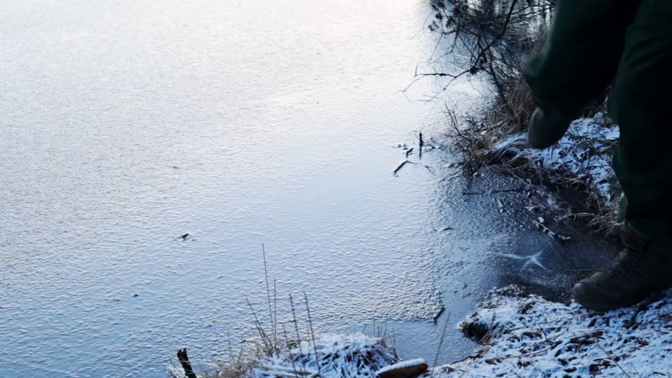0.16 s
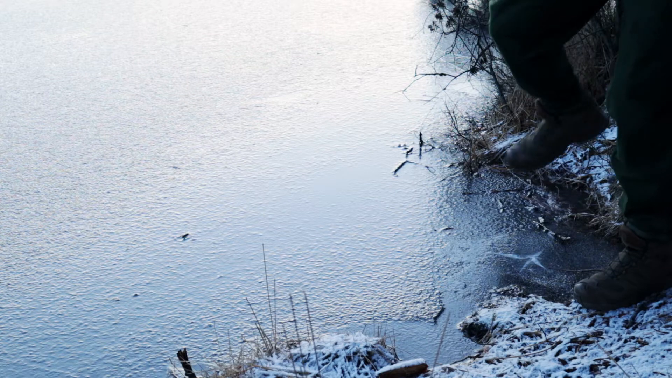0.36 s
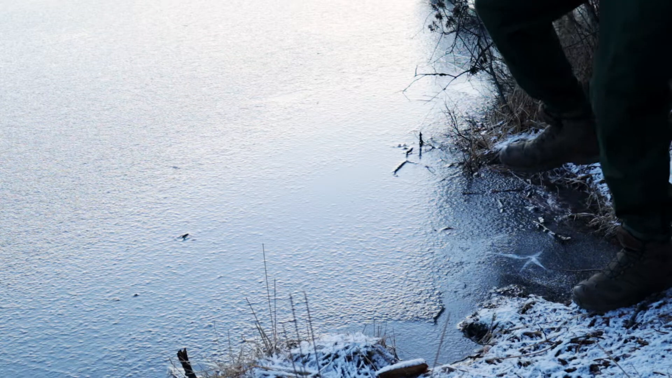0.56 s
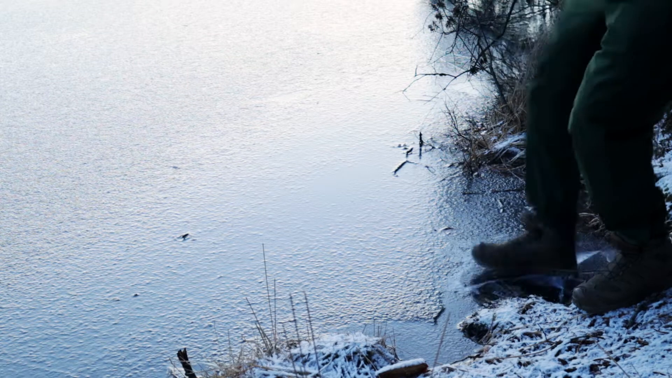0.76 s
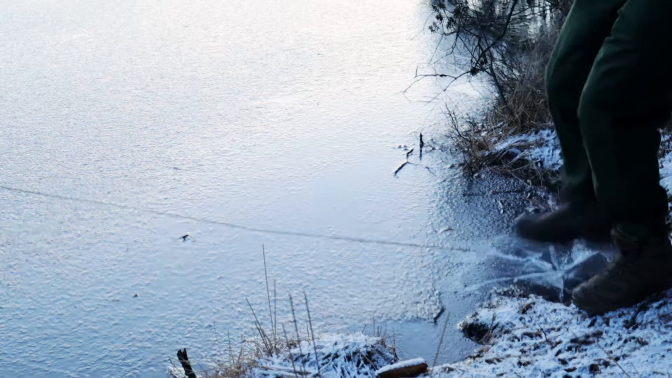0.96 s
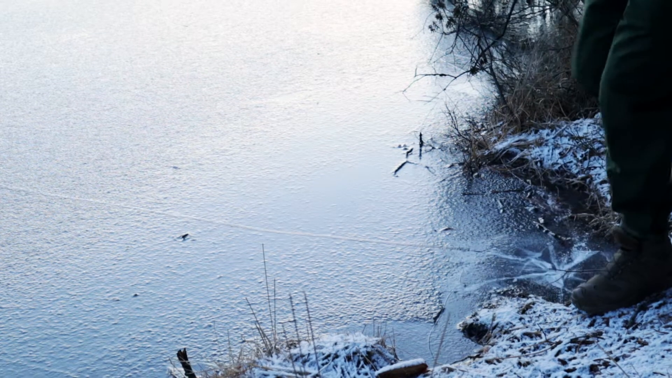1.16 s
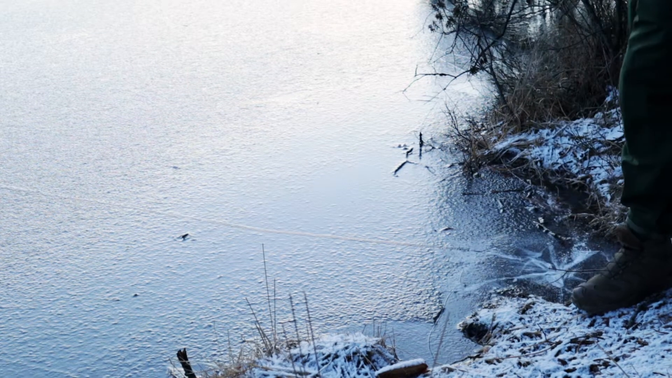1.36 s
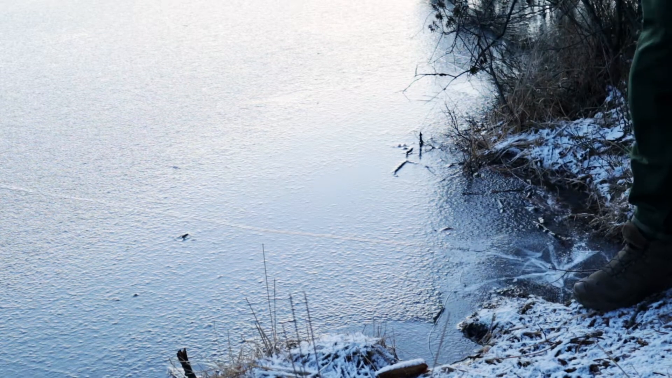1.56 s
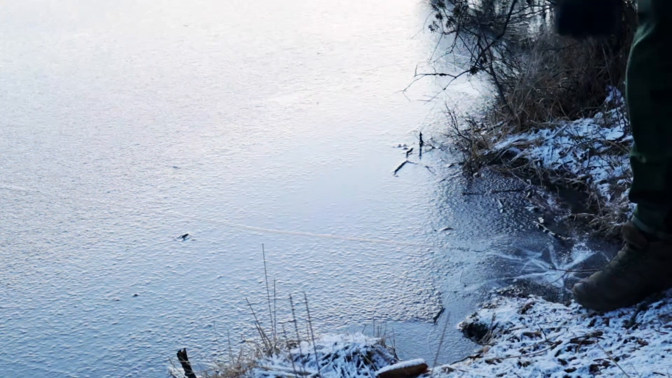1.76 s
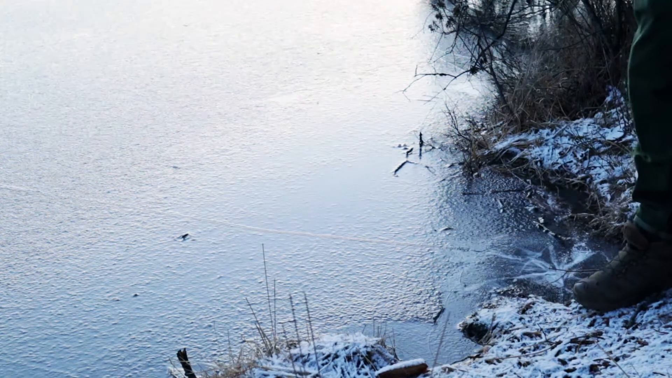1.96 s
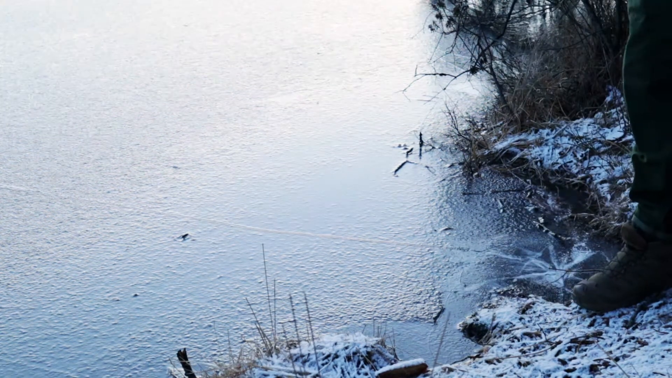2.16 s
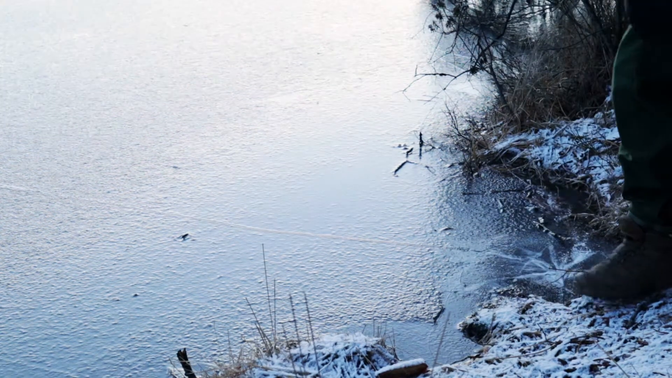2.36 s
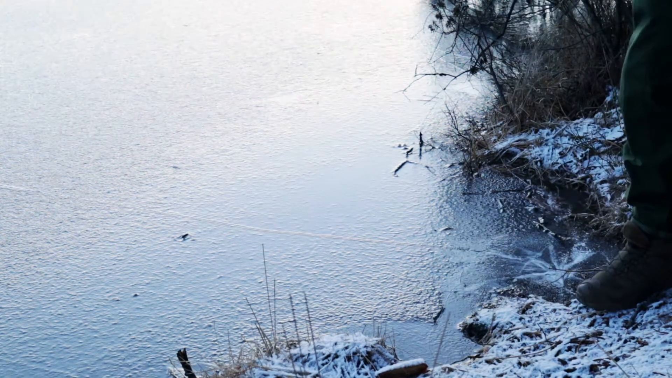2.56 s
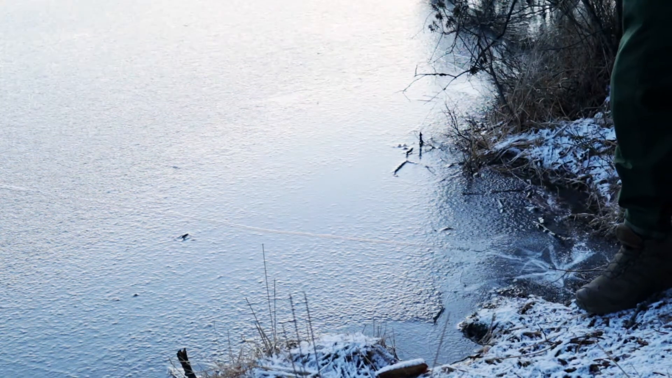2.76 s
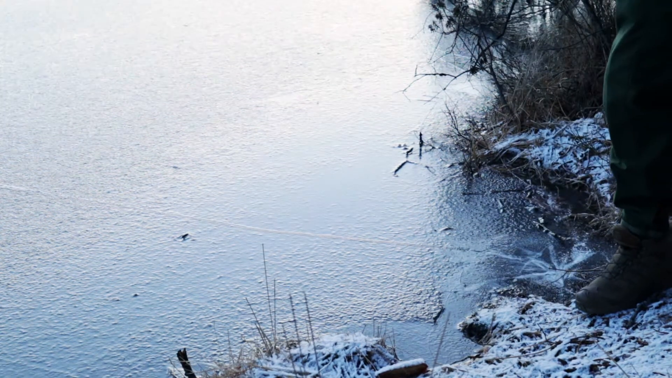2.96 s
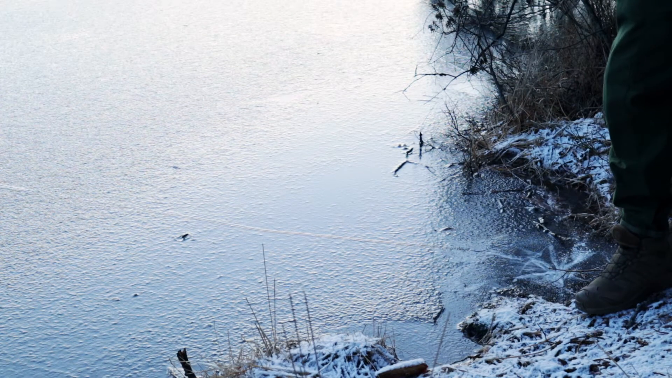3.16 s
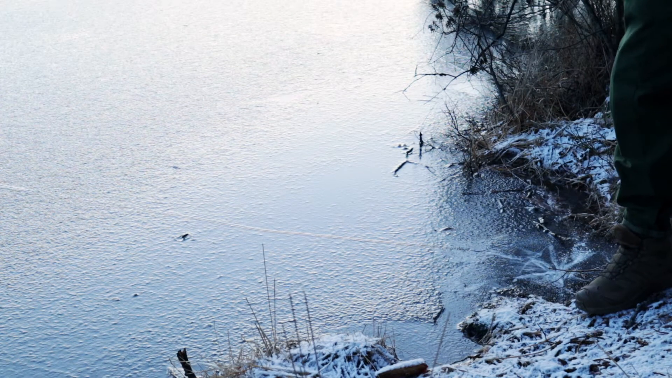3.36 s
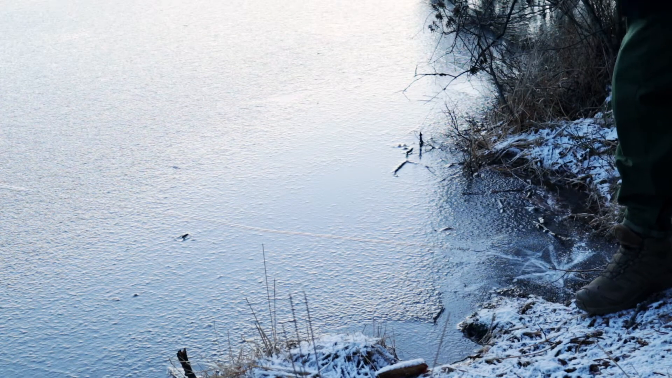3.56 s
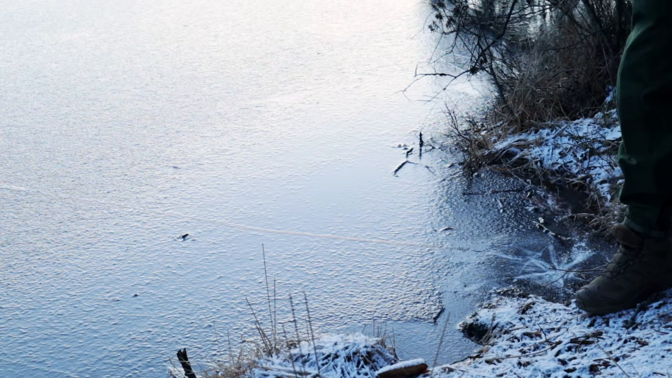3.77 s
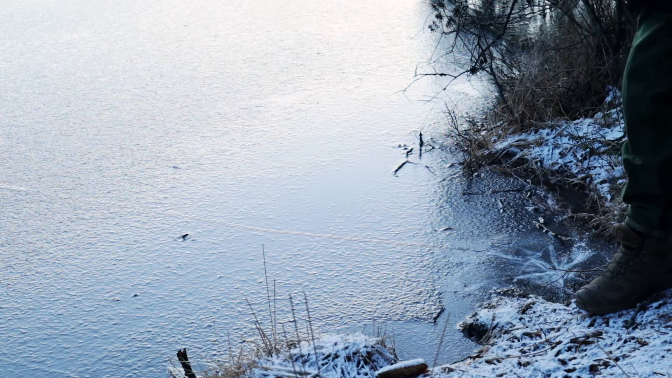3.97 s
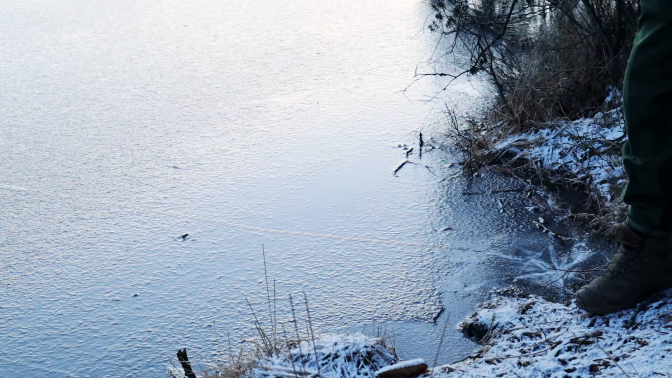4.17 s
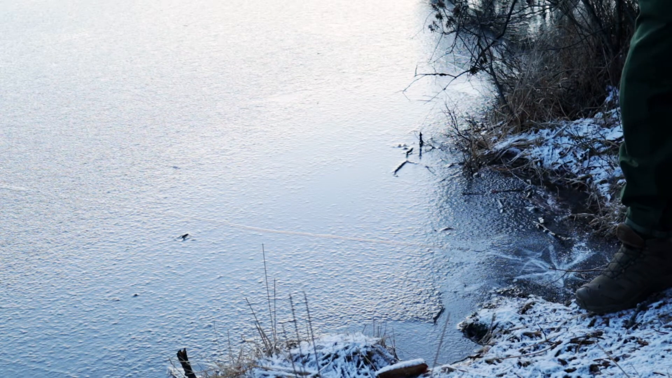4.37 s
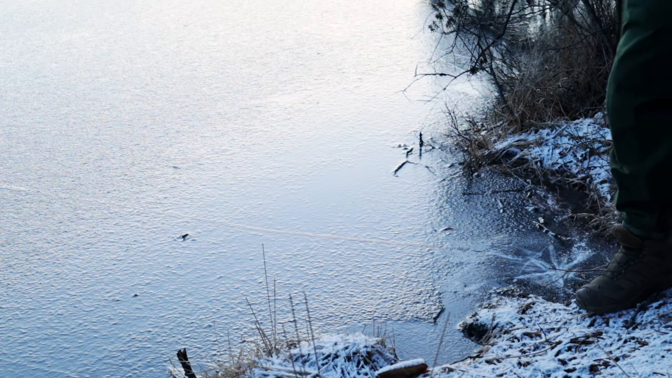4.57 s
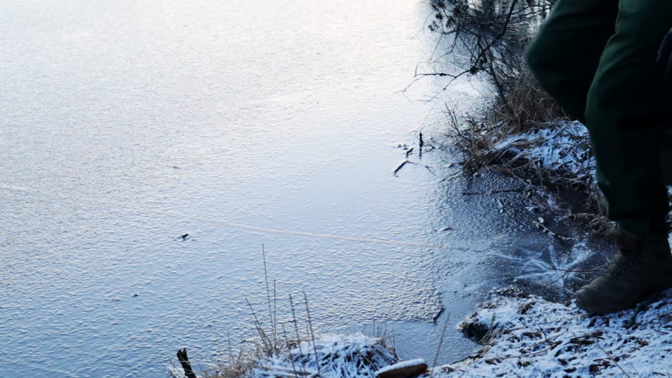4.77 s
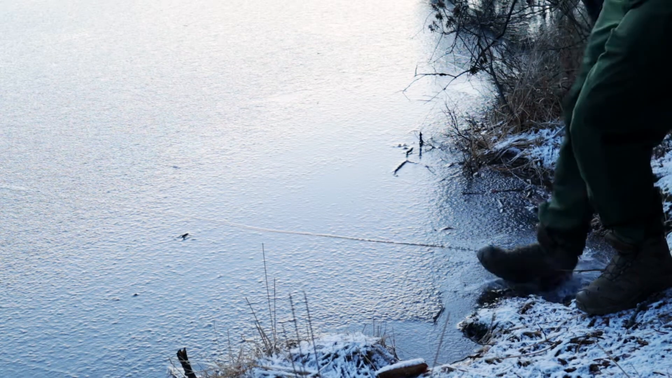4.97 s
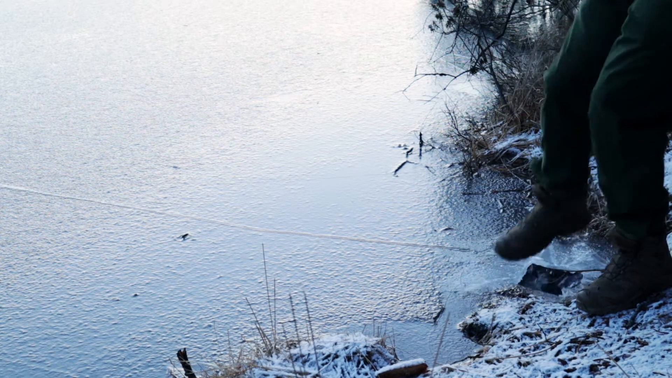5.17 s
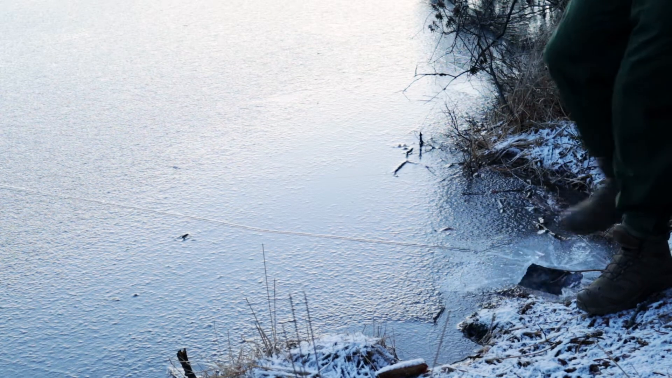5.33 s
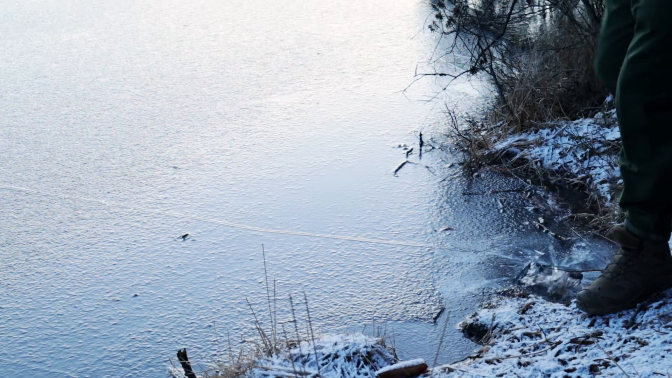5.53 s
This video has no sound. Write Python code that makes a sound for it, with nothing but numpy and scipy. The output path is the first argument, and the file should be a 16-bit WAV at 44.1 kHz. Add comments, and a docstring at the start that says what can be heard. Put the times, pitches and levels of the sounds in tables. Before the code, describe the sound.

Thin ice cracks loudly under a stamp, ticks quietly as the walker shifts, then a second stamp smashes through it with clinking shards and water plops.

```python
"""On a frozen shore, a little to the right, a boot stamps twice on thin ice; a faint outdoor hush lies behind.
The first stamp cracks the sheet and the sole grinds over it: sharp releases, bending-wave chirps, noise grains.
The ice ticks in short wavelets while the walker shifts weight; trousers rustle and the boot scuffs in shaped noise.
The second stamp breaks through: shards clink as damped modes and water gulps as tones of rising pitch."""
import sys
import numpy as np
from scipy import signal
from scipy.fft import rfft, irfft, next_fast_len
from scipy.io import wavfile
from scipy.ndimage import uniform_filter1d, map_coordinates

SR = 44100
rng = np.random.default_rng(int(sys.argv[2]) if len(sys.argv) > 2 else 0)


def bounce(signal):
    """Save signal as a 16-bit WAV file at the path given by the first command-line argument."""
    frames = np.transpose(np.atleast_2d(signal))
    limited = np.clip(frames, -1, 1)
    pcm = np.round(limited * 32767).astype(np.int16)
    wavfile.write(sys.argv[1], SR, pcm)


N = 246959

STAMP_S, BREAK_S = .85, 5.01  # the first stamp; the boot goes through
TOP_HZ = 16300  # band limit of the microphone
# An attack is the time in which a movement rises by 60 dB; a t60 is the time in which it falls by 60 dB.
CRUSH_ATTACK_S, CRUSH_HOLD_S = 0.02, 0.0041
SLIDE_ATTACK_S, SLIDE_T60_S = 0.021, 0.12
SWISH_ATTACK_S, SCUFF_ATTACK_S = 0.56, .06
DEBRIS_DB, DEBRIS_T60_S, DEBRIS_DELAY_S = -57, 6, 0.08  # splinters settle after the sheet has given way

# All source levels are mix levels, ahead of the left-right shading and the microphone.
# outdoor hush: t/s, level/dB
HUSH_LEVEL = [(0, -54.5), (1.5, -50.5), (2.6, -50.5), (3.6, -53), (4.5, -52), (5.6, -50.5)]
# a leg moves and the trousers swish: t/s, hold/s, level/dB, t60/s
SWISHES = [(0, 0.088, -52, 0.44), (0.284, 0.021, -52.5, 1.13), (0.566, 0.17, -58.5, 0.46),
           (0.694, 0.14, -54, .6), (1.097, 0.05, -52, 1.7), (1.526, 0.075, -52.5, 0.83),
           (1.72, 0.067, -56, 1.1), (2.205, 0.077, -46.5, .09), (2.335, 0.014, -48.5, 1.02),
           (2.562, 0.61, -60.5, 7.7), (4.675, 0.032, -56.5, 0.23), (4.817, 0.23, -59.5, .5)]
# the boot twists on the frozen bank: t/s, hold/s, level/dB, t60/s
SCUFFS = [(2.19, 0.023, -45, .2), (2.222, 0.04, -47, .1), (2.26, 0.0087, -36, 0.037),
          (2.279, .006, -43, 0.041), (2.311, .004, -45.5, .08), (2.331, 0.022, -46.5, 0.28)]
# water slops over the rim of the hole: t/s, hold/s, level/dB, t60/s
SPLASHES = [(5.489, 0.011, -47.5, 0.067), (5.512, 0.011, -33.5, 0.055), (5.54, .003, -49, .06),
            (5.56, .008, -42.5, 0.13)]
# air pockets ring in the water: t/s, level before the attack/dB, starting f/Hz, t60/s
BUBBLES = [(.173, -42.5, 410, 0.031), (.177, -41.5, 244, 0.064), (3.96, -44.5, 358, 0.08),
           (5.064, -25.5, 1012, 0.057), (5.1455, -16.5, 660, 0.028), (5.167, -23, 620, 0.023),
           (5.174, -22, 640, 0.042), (5.195, -42, 551, 0.2), (5.329, -41, 350, 0.036),
           (5.377, -46, 655, .04), (5.482, -28.5, 246, 0.1), (5.5055, -5, 820, 0.011),
           (5.507, -23, 241, 0.064), (5.511, -26, 1152, 0.034), (5.514, -30.5, 1530, 0.032),
           (5.535, -42, 690, .06), (5.517, -30, 720, 0.039), (5.521, -23.5, 1814, 0.038),
           (5.522, -22, 2410, 0.03), (5.551, -30.5, 756, 0.055), (5.552, -25, 268, 0.074),
           (5.562, -30.5, 233, 0.11), (5.565, -27.5, 3520, 0.015), (5.58, -34, 1940, 0.026)]
# loose pieces of ice clink: t/s, level/dB, base f/Hz, base t60/s
SHARDS = [(.9405, -27, 1980, 0.032), (.9555, -24, 890, 0.017), (0.955, -33, 1660, 0.037),
          (1.056, -28, 853, 0.11), (1.068, -32, 1796, 0.062), (1.079, -28.5, 770, 0.078),
          (1.1, -25, 2710, 0.034), (1.103, -26.5, 2230, 0.047), (1.11, -20.5, 2820, 0.018),
          (2.258, -27, 1696, 0.022), (2.4155, -18.5, 1440, 0.014), (5.0768, -9, 9800, 0.0075),
          (5.1058, -32, 6400, 0.014), (5.322, -42, 3970, 0.028), (5.327, -47, 2530, 0.061),
          (5.265, -49, 1180, .04), (5.298, -42, 3800, .03), (5.438, -48, 1450, .03),
          (5.371, -48, 3800, 0.042), (5.387, -45, 3110, 0.033), (5.391, -45, 2230, 0.037),
          (5.434, -38, 5900, 0.014), (5.457, -50, 1560, 0.045), (5.462, -36, 5570, 0.018)]
# modes of an uneven flake: ratio to the base f, level/dB, share of the base t60
SHARD_MODES = [(.81, -14, 0.59), (1, 1.5, 0.96), (1.17, -6.5, 0.73), (1.42, -18, 0.61)]
# the sole slides over frost: t/s, hold/s, level/dB
SLIDES = [(0.857, 0.004, -31), (0.885, 0.071, -41.5), (0.96, 0.068, -33), (1.026, 0.0092, -30),
          (1.095, 0.0051, -29.5), (5.017, 0.04, -33), (5.136, 0.045, -37.5), (5.203, 0.11, -46),
          (5.522, .005, -41), (5.551, 0.0069, -41.5)]
# the boot crushes ice, or loose pieces wash together: t/s, grit level/dB, sheet heave level/dB, t60/s
CRUSHES = [(0, -40, -40, 0.13), (.06, -64, -47, 0.48), (0.863, -34, -27.5, 0.47), (.887, -46, -46, 0.1),
           (.932, -42, -29.5, 0.33), (0.995, -44, -31, .2), (1.039, -41, -28, 0.31),
           (1.067, -33.5, -43, 0.21), (1.101, -32, -34, 0.19), (1.128, -53, -42, 0.12),
           (5.0225, -21.5, -31, 0.15), (5.062, -40.5, -41, 0.57), (5.145, -42, -38, 0.21),
           (5.173, -33.5, -52, 0.2), (5.205, -63, -64, 0.43), (5.325, -55, -60, 0.13),
           (5.37, -54.5, -60, 1), (5.498, -43, -68, .1), (5.524, -40, -71, 0.15), (5.558, -47, -74, 0.12)]
# the sheet flexes under the boot: t/s, level before the attack/dB, starting f/Hz, t60/s
KNOCKS = [(.005, -32, 110, 0.031), (.8535, -5, 204, 0.028), (.8635, -21.5, 105, 0.06),
          (.9295, -22.5, 147, 0.063), (.9405, -16.5, 95, 0.026), (.973, -22, 109, 0.037),
          (.9935, -18.5, 119, 0.028), (1.04, -25, 132, 0.014), (1.0935, -20, 222, 0.023),
          (1.125, -35, 89, .08), (1.15, -31, 48.3, 0.32), (1.474, -33, 110, 0.031),
          (2.263, -19, 160, 0.026), (2.3685, -33.5, 240, 0.027), (2.4, -43, 240, 0.016),
          (2.4165, -17, 394, 0.01), (2.4235, -32, 230, 0.025), (5.0135, -5.5, 188, 0.021),
          (5.024, -9, 75, 0.032), (5.0215, -11.5, 243, 0.068), (5.0615, -14, 198, 0.017),
          (5.1475, -21, 227, 0.026), (5.1665, -11.5, 300, 0.0075), (5.178, -17, 350, 0.023),
          (5.039, -26, 80, .09), (5.278, -43, 348, .025)]
# single light ticks of the strained ice: t/s, peak level/dB, f/Hz, treble edge level/dB
TICKS = [(0.0226, -24.5, 1680, -10), (0.0469, -31, 2900, -16), (0.0823, -34, 1890, -11),
         (0.089, -32, 1180, -23), (0.1384, -24, 1250, -24), (0.1473, -25.5, 1270, -18),
         (0.1621, -35.5, 1190, -19), (0.3132, -34, 1050, -17), (0.4118, -33.5, 2070, -8),
         (0.6336, -33.5, 1050, -22), (1.6097, -31, 2500, -1), (2.5825, -31.5, 1150, -36),
         (2.9414, -30, 1310, -23), (3.111, -36.5, 1610, -17), (3.2155, -36.5, 1000, -32),
         (3.35, -37.5, 1220, -19), (3.94, -43, 1300, -19), (4.668, -30.5, 930, -39),
         (4.6959, -23.5, 2140, -36), (4.729, -36.5, 940, -30), (5.229, -34, 2200, -8),
         (5.274, -41, 1900, -10), (5.457, -30, 2400, -1)]
# clean fractures, heard as a falling chirp:
# t/s, peak level/dB, tilt/dB per octave, top f/Hz, travel time of the bending wave at 1 kHz/s
SNAPS = [(0.8524, -8, -1, 3540, 0.00087), (0.887, -9.5, 1, 7000, 0.00053), (0.9414, -10, 6, 7500, 0.00039),
         (0.9553, -22, 1.5, 3600, 0.00056), (0.903, -25, 1.5, 4000, 0.00068),
         (0.9847, -16.5, 3.5, 4500, 0.00079), (1.0938, -11, 8, 5000, 0.00025),
         (1.1098, -20.5, -2.5, 4000, 0.00027), (1.1326, -21.5, 3, 3200, 0.00077),
         (1.1416, -19, 1.5, 4800, 0.00059), (2.4152, -15.5, 3, 5100, 0.0014),
         (2.4228, -25, -0.5, 2200, 0.0011), (5.0126, -9, -3, 2600, 0.00079), (5.0605, -26, 4, 6000, .0004),
         (5.0186, -5.5, 2, 11000, 0.00027), (5.0221, -4.5, 2.5, 3500, .0005),
         (5.0238, -11, 9, 3000, 0.00051), (5.0264, -10, 6, 6000, 0.00032),
         (5.0309, -14.5, -0.5, 3000, 0.00067), (5.0617, -15.5, -1.5, 3500, 0.00062),
         (5.0459, -14, 3, 4000, 0.00048), (5.163, -21, 8, 8000, 0.00043), (5.1734, -5.5, 9, 5000, 0.00028),
         (5.1746, -15.5, 0, 4200, 0.00045)]
# fractures that run through the sheet: t/s, level/dB, f/Hz, treble edge level/dB, splintering t60/s
CRACKS = [(0.8535, -18, 980, -34, 0.008), (0.8567, -16.5, 2180, -8.5, 0.02), (.864, -24.5, 2000, 2, .02),
          (0.8695, -29, 2000, -20, 0.02), (0.878, -26.5, 1400, -25.5, 0.014),
          (0.8927, -30.5, 1500, -24, 0.0061), (0.903, -39, 1400, -20, 0.0064),
          (0.9298, -31, 800, -18, 0.008), (0.9407, -29, 3120, -20, 0.012), (1.038, -31, 1200, -13, 0.092),
          (1.088, -26.5, 2300, -8, 0.011), (1.0926, -22.5, 2300, -5, 0.028),
          (1.0993, -19.5, 2570, 7.5, 0.0051), (1.1035, -27, 2600, 2, .006), (1.11, -27, 2800, 0, 0.0053),
          (1.4708, -46, 2530, -1, 0.06), (1.545, -51, 1000, -20, .09), (1.562, -44, 1400, -17, 0.047),
          (1.6605, -49.5, 1490, -24, 0.099), (1.73, -50.5, 1000, -15, 0.11),
          (2.2586, -36.5, 1920, -6, 0.014), (2.2682, -39, 1600, -25, 0.012),
          (5.014, -19.5, 910, -22, 0.013), (5.0175, -14, 1800, -0.5, 0.019), (5.0222, -19, 1710, -9, 0.012),
          (5.026, -22.5, 1800, 0, 0.008), (5.0314, -26, 1040, -13, 0.02), (5.046, -20, 1700, -22, 0.016),
          (5.0538, -28.5, 1620, -27, 0.048), (5.063, -21.5, 1070, -15, 0.026),
          (5.0753, -28.5, 5000, -20, 0.01), (5.139, -35.5, 1500, -10, 0.016),
          (5.147, -36, 1800, -22, 0.016), (5.1616, -26.5, 2000, -2, 0.0089),
          (5.1657, -25.5, 1090, -1.5, 0.02), (5.1741, -28.5, 3000, -25, 0.022),
          (5.4701, -30, 6250, 35, 0.021), (5.507, -34, 885, -23, 0.069), (5.5215, -38, 2190, -26, 0.082),
          (5.5512, -41, 900, -12, 0.014)]
# ring of the ice: f/Hz, width/Hz, level/dB
SHEET_MODES = [(715, 120, 14.5), (1000, 30, -18), (1510, 17, -8), (1560, 40, 9), (2300, 46, 11),
               (3040, 66, 17), (3660, 94, 17)]

# spectra of outdoor air, cloth, scuffed frost, scraping sole, crushed grit and heaving sheet: f/Hz, level/dB
AIR_SPECTRUM = [(12, -50), (20, -8), (85, -5.5), (202, -9), (232, -6), (266, -11), (362, -9.5), (427, -9.5),
                (667, -10), (857, -9.5), (1230, -13.5), (3170, -18), (8400, -32), (11700, -30.5),
                (15500, -22.5)]
CLOTH_SPECTRUM = [(60, 6), (170, -1.5), (350, -1), (700, -3.5), (1800, -4), (3500, -5.5), (7000, -10.5),
                  (11000, -9.5), (11800, -8.5), (12500, -32), (15500, -36)]
SCUFF_SPECTRUM = [(50, -16), (130, 0), (300, -4.5), (700, -1), (1150, -7), (1750, 0), (2500, -7.5),
                  (3400, -6), (6000, -15), (11000, -17), (12500, -39)]
SCRAPE_SPECTRUM = [(300, -7), (1000, -3.5), (3000, -3), (6000, -4), (8000, -5.5), (10500, -2), (12500, -3),
                   (15500, -31)]
GRIT_SPECTRUM = [(200, -4), (400, -5), (600, -13), (1000, -8), (1500, 2), (3000, 0), (5000, -4.5),
                 (9000, -12), (15000, -48)]
HEAVE_SPECTRUM = [(26, -45), (42, -1), (80, -7.5), (150, -9.5), (280, -17), (500, -19.5), (1500, -34)]
# spectrum of a clean fracture before its own tilt: f/Hz, level/dB
SNAP_SPECTRUM = [(60, -16), (200, 6), (500, -2.5), (1000, -3), (2300, -2), (4200, -7), (7000, -8),
                 (14000, -24)]
# left-right likeness of close and of distant sound: f/Hz, likeness (1 same, -1 opposed)
NEAR_ALIKE = [(150, 1), (300, .98), (700, .78), (1500, .45), (3000, .15), (7000, -.3), (12000, -.65)]
FAR_ALIKE = [(60, 1), (130, 0.92), (290, 0.12), (640, -0.16), (1410, -0.49), (3100, -0.69), (6820, -0.51),
             (15000, -1.08)]
# colour between the sides: f/Hz, left minus right level/dB
SHADE = [(200, 0), (700, .5), (1300, -1), (2400, -4.5), (4400, -3.5), (8000, -.5), (14000, 1)]
# delay between the sides: f/Hz, phase by which left trails/rad
LAG = [(100, 0), (700, .33), (1500, .75), (3000, 1.3), (6000, 1.95), (8500, 2.05), (11000, 2.55)]
# decay of the tail from bank and bushes: f/Hz, t60/s
SHORE_DECAY = [(200, 0.043), (1500, 0.069), (10000, 0.14)]


def amp(db):
    """Decibels to gain."""
    return 10 ** (np.asarray(db) / 20)


def unit(x):
    """Scaled to rms 1."""
    return x / np.sqrt(np.mean(x ** 2) + 1e-20)


def along(points, hz):
    """Values read off (f/Hz, value) points on a log frequency axis."""
    f, value = np.transpose(points)
    return np.interp(np.log(hz + 1), np.log(f + 1), value)


def wobble(rate):
    """A smooth random curve, rate knots a second."""
    knots = rng.standard_normal(int(N * rate / SR) + 4)
    return map_coordinates(knots, [np.arange(N) * rate / SR])


def filtered(x, response):
    """x times a complex response of frequency."""
    n = x.shape[-1]
    padded = next_fast_len(n + 4096)
    spectrum = rfft(x, padded) * response(np.fft.rfftfreq(padded, 1 / SR))
    return irfft(spectrum, padded)[..., :n]


def resonance(f, hz, width):
    """Causal response of one mode."""
    return 1j * f * width / (hz * hz - f * f + 1j * f * width)


def low_cut(f, hz):
    """A small source radiates little below hz."""
    return f * f / (f * f - hz * hz - 1.4j * f * hz)


def add(track, s, sound):
    """Mix a sound into the track at s seconds."""
    part = track[..., max(round(s * SR), 0):][..., :sound.shape[-1]]
    part += sound[..., :part.shape[-1]]


def swell(s, hold, db, t60, attack):
    """Power per sample of one movement: it is fully up at s, holds and dies away."""
    t = np.arange(N) / SR - s
    rise_db = -60 * np.maximum(-t, 0) / attack
    fall_db = -60 * np.maximum(t - hold, 0) / t60
    return amp(db + rise_db + fall_db) ** 2


def spread(pair, alike):
    """Two unrelated signals become left and right with a given likeness."""
    def mid_side_gains(f):
        turn = np.arccos(np.clip(along(alike, f), -1, 1)) / 2
        return np.array([np.cos(turn), np.sin(turn)])
    mid, side = filtered(pair, mid_side_gains)
    return np.array([mid + side, mid - side])


def texture(spectrum, alike, grain_db, grain_rate):
    """Stereo noise of rms 1 that comes in grains of random strength."""
    pair = rng.standard_normal((2, N)) * amp(grain_db * wobble(grain_rate))
    coloured = filtered(pair, lambda f: amp(along(spectrum, f)))
    return unit(spread(coloured, alike))


def patches(x, depth_db=4):
    """Pieces of changing size favour shifting pitches; the result has rms 1."""
    z = signal.stft(x, nperseg=512)[2]
    field = rng.standard_normal(z.shape[1:])
    field = uniform_filter1d(field, size=3, axis=0)  # smooth over frequency
    field = uniform_filter1d(field, size=4, axis=1)  # smooth over time
    return unit(signal.istft(z * amp(depth_db * unit(field)), nperseg=512)[1][:, :N])


def from_right(x):
    """Sound from the right reaches the left side a little later."""
    half = lambda f: np.exp(-.5j * along(LAG, f))
    return filtered(x, lambda f: np.array([half(f), 1 / half(f)]))


def rings(table, attack, glide):
    """Damped tones whose pitch moves by the share glide over one t60."""
    out = np.zeros(N)
    for s, db, hz, t60 in table:
        t = np.arange(int(t60 * SR) + 2) / SR
        phase = 2 * np.pi * np.cumsum(hz * (1 + glide * t / t60)) / SR
        envelope = amp(db - 60 * t / t60) * (1 - np.exp(-t / attack))
        add(out, s, envelope * np.sin(phase))
    return from_right(out)


def swarm(start, end, per_second, hz, octaves, cycles, size_db, glide=0):
    """Random tiny tones of rms 1, scattered in time, size and pitch (octaves either side of hz)."""
    when, where, size = rng.random((int(per_second * (end - start)), 3)).T
    pitch = hz * 2 ** (octaves * (2 * where - 1))
    times = start + (end - start) * when
    table = np.transpose([times, size_db * size ** 2, pitch, cycles / pitch])
    out = rings(table, attack=.0001, glide=glide)
    return out / np.sqrt(np.sum(out ** 2) / (2 * (end - start) * SR))


def hush():
    """Distant outdoor noise from all sides, its level drifting slowly."""
    s, db = np.transpose(HUSH_LEVEL)
    air = texture(AIR_SPECTRUM, FAR_ALIKE, grain_db=.7, grain_rate=25)
    return amp(np.interp(np.arange(N) / SR, s, db)) * air


def lake(x, hz=770, width=400, t60=4.5, waver_db=3.5, waver_rate=14):
    """The wide frozen surface sings on in one band, wavering as waves return from its edges."""
    t = np.arange(2 * SR) / SR
    noise = rng.standard_normal((2, len(t))) * amp(-60 * t / t60)
    tail = filtered(noise, lambda f: resonance(f, hz, width) ** 2)
    song = signal.fftconvolve(x.mean(0)[None], tail / np.linalg.norm(tail[0]), axes=1)[:, :N]
    return song * unit(amp(waver_db * wobble(waver_rate)))


def shore(x):
    """Bank and bushes scatter a short tail that rings longer in the treble."""
    hz, t, z = signal.stft(rng.standard_normal((2, SR // 3)), SR, nperseg=256)
    decay = amp(-60 * t / along(SHORE_DECAY, hz)[:, None])
    tail = spread(signal.istft(z * decay, SR, nperseg=256)[1], NEAR_ALIKE)
    return signal.fftconvolve(x.mean(0)[None], tail / np.linalg.norm(tail[0]), axes=1)[:, :N]


def rustle(clump_db=2.0, clump_rate=70):
    """Cloth and frosty grass rub as the legs move, catching unevenly on the folds."""
    rubbing = np.sqrt(sum(swell(*swish, SWISH_ATTACK_S) for swish in SWISHES))
    cloth = texture(CLOTH_SPECTRUM, NEAR_ALIKE, grain_db=1.5, grain_rate=1000)
    return rubbing * amp(clump_db * wobble(clump_rate)) * cloth


def scuffs():
    """The boot twists on the frozen bank; frost crystals give way in small separate grains."""
    pressure = np.sqrt(sum(swell(*scuff, SCUFF_ATTACK_S) for scuff in SCUFFS))
    return pressure * texture(SCUFF_SPECTRUM, NEAR_ALIKE, grain_db=4.5, grain_rate=900)


def debris(clump_db=3, clump_rate=60):
    """Small splinters jostle in the hole, in clumps and ever more faintly."""
    clinks = swarm(BREAK_S, N / SR, per_second=420, hz=2300, octaves=1.3, cycles=26, size_db=15)
    settling = np.sqrt(swell(BREAK_S + DEBRIS_DELAY_S, 0, DEBRIS_DB, DEBRIS_T60_S, CRUSH_ATTACK_S))
    return clinks * settling * amp(clump_db * wobble(clump_rate))


def splash():
    """Slopping water traps a spray of small bubbles, each rising quickly in pitch."""
    spray = swarm(BREAK_S, N / SR, per_second=800, hz=1600, octaves=1.2, cycles=28, size_db=10, glide=.35)
    return spray * np.sqrt(sum(swell(*slop, CRUSH_ATTACK_S) for slop in SPLASHES))


def bubbles():
    """Air pockets ring in the water and rise in pitch as they near the surface."""
    return rings(BUBBLES, attack=0.001, glide=.22)


def shards():
    """Each loose flake rings in a few unrelated modes."""
    modes = [(s, db + level, hz * ratio, t60 * life)
             for s, db, hz, t60 in SHARDS for ratio, level, life in SHARD_MODES]
    return rings(modes, attack=0.000084, glide=0)


def scrape():
    """The sole hisses over frost as it slides."""
    sliding = np.sqrt(sum(swell(s, hold, db, SLIDE_T60_S, SLIDE_ATTACK_S) for s, hold, db in SLIDES))
    return sliding * texture(SCRAPE_SPECTRUM, NEAR_ALIKE, grain_db=2.5, grain_rate=1600)


def heave():
    """The sheet heaves under the boot in a low rumble."""
    pressure = np.sqrt(sum(swell(s, CRUSH_HOLD_S, db, t60, CRUSH_ATTACK_S) for s, _, db, t60 in CRUSHES))
    return pressure * texture(HEAVE_SPECTRUM, NEAR_ALIKE, grain_db=2.0, grain_rate=130)


def crunch(bed_db=-4.0, drops_db=-2):
    """Crushed grit crackles with tiny chips; after the break, water fizzes up through the hole instead."""
    pressure = np.sqrt(sum(swell(s, CRUSH_HOLD_S, db, t60, CRUSH_ATTACK_S) for s, db, _, t60 in CRUSHES))
    chips = swarm(STAMP_S, BREAK_S, per_second=260, hz=1900, octaves=1.3, cycles=7, size_db=15)
    drops = swarm(BREAK_S, N / SR, per_second=300, hz=1700, octaves=1.6, cycles=30, size_db=12, glide=.2)
    bed = patches(texture(GRIT_SPECTRUM, NEAR_ALIKE, grain_db=4.5, grain_rate=600))
    return pressure * (amp(bed_db) * bed + chips + amp(drops_db) * drops)


def knocks():
    """The flexing sheet thuds; water loads it, so its pitch sags."""
    thuds = rings(KNOCKS, attack=0.00013, glide=-0.17)
    return filtered(thuds, lambda f: low_cut(f, hz=54.0))


def ice_release(push, hz, edge_db, breadth, lag=0.000256, edge_hz=9800, edge_width=3500, low_hz=170):
    """Breaking ice answers with a broad pitch and a bright edge; bending waves bring the low notes later."""
    def response(f):
        top = 1.54 * hz
        high_cut = top ** 2 / (top ** 2 - f * f + 1.2j * f * top)
        body = resonance(f, hz, breadth * hz) * high_cut * low_cut(f, low_hz)
        edge = amp(edge_db) * resonance(f, edge_hz, edge_width)
        bending = np.exp(-4j * np.pi * lag * np.sqrt(f * hz))  # lag is the delay in seconds at hz
        return (body + edge) * bending
    return filtered(push, response)


def ticks(rebound=0.22):
    """A hairline crack gives one short dull wavelet and a weak rebound."""
    out, t = np.zeros(N), np.arange(SR // 50) / SR
    for s, db, hz, edge_db in TICKS:
        tick = ice_release(1. * (t == 0), hz, edge_db, breadth=0.95, lag=.00008, low_hz=365)
        tick = amp(db) * tick / np.abs(tick).max()
        add(out, s, tick)
        add(out, s + 0.00132 * rng.uniform(0.86, 1.75), rebound * tick)
    return from_right(out)


def snaps():
    """A lone fracture sends one dry bending wave through the sheet, treble first and bass last."""
    out, t = np.zeros(N), np.arange(SR // 25) / SR
    for s, db, tilt, top_hz, travel in SNAPS:
        def response(f):
            khz = (f + 1) / 1000
            colour = amp(along(SNAP_SPECTRUM, f) + tilt * np.log2(khz))
            high_cut = 1 / np.sqrt(1 + (f / top_hz) ** 6)
            bending = np.exp(-4j * np.pi * travel * f / np.sqrt(khz))
            return colour * high_cut * bending
        chirp = filtered(1. * (t == 0), response)
        add(out, s, amp(db) * chirp / np.abs(chirp).max())
    return from_right(out)


def sheet_ring(x, stretch):
    """A fracture sets its piece of ice ringing briefly; stretch scales the pitch with the size of the piece."""
    def response(f):
        return sum(amp(db) * resonance(f, stretch * hz, width) for hz, width, db in SHEET_MODES)
    return filtered(x, response)


def cracks(splinter=0.29, spiky_db=5, scatter=0.76, breadth=3.3, ring_db=-11, size_spread=0.061):
    """Each fracture is one sharp release followed by a dying run of splinters from all around the boot."""
    out, t = np.zeros((2, N)), np.arange(SR // 10) / SR
    for s, db, hz, edge_db, t60 in CRACKS:
        spiky = rng.standard_normal((3, len(t))) * amp(spiky_db * rng.standard_normal(len(t)))
        run = unit(spiky) * amp(-60 * t / t60)
        release = 1. * (t == t[8])
        push = from_right(release + splinter * run[0])
        push = push + scatter * splinter * spread(run[1:], NEAR_ALIKE)
        burst = ice_release(push, hz, edge_db, breadth)
        seconds = 0.0015 + t60 / 14  # effective length of the burst
        burst = amp(db) * burst * np.sqrt(2 * seconds * SR / np.sum(burst ** 2))
        stretch = np.exp(size_spread * rng.standard_normal())
        add(out, s, burst + amp(ring_db) * sheet_ring(burst, stretch))
    return out


def scene():
    """Ice, water and walker on the open shore."""
    blows = cracks() + knocks() + bubbles() + shards()
    clean = snaps() + ticks()  # lone fractures run flat along the ice and echo a little less
    echo = shore(amp(-11.0) * blows + amp(-12.5) * clean)
    grinding = crunch() + scrape() + heave()
    near = blows + clean + echo + grinding + scuffs() + splash() + debris() + rustle()
    # the body of the microphone shades the left side
    near = filtered(near, lambda f: amp(along(SHADE, f) * [[.5], [-.5]]))
    unbroken = np.arange(N) / SR < BREAK_S  # only a whole sheet carries the blows out over the lake
    return near + amp(-34.0) * lake(near * unbroken) + hush()


def record(dry):
    """The microphone dulls the top octave, rounds the highest peaks and keeps nothing above its band limit."""
    dull = [(11000, 0), (13000, -6), (16000, -20)]  # f/Hz, level/dB
    sound = filtered(dry, lambda f: amp(along(dull, f)))
    rounded = sound / (1 + (sound / .7) ** 6) ** (1 / 6)
    return filtered(rounded, lambda f: f < TOP_HZ)


dry = scene()
out = record(dry)
bounce(out)
```